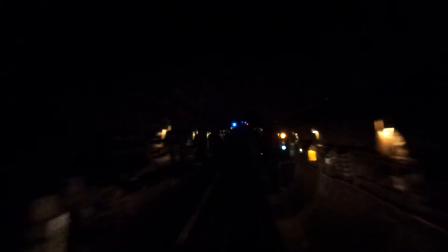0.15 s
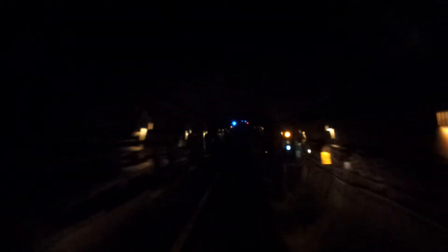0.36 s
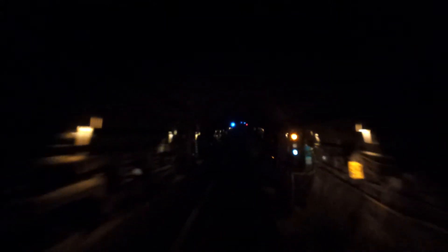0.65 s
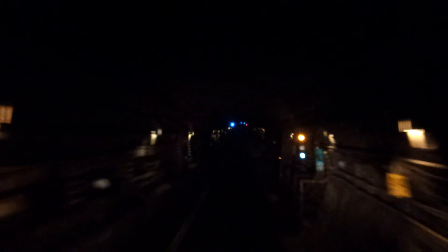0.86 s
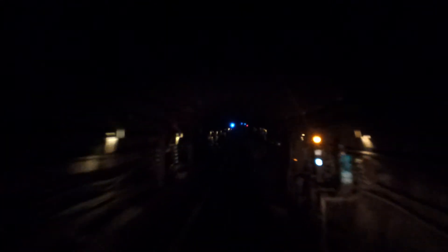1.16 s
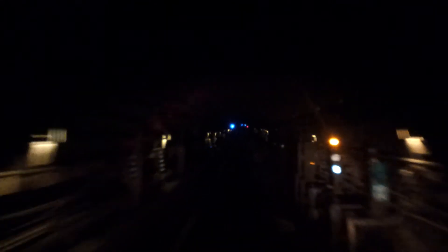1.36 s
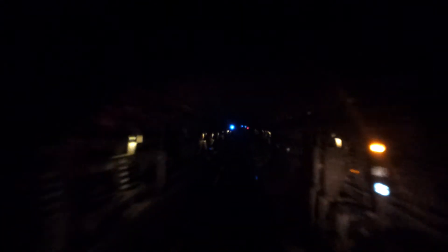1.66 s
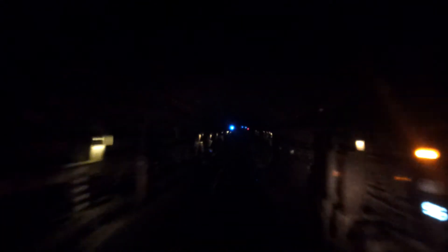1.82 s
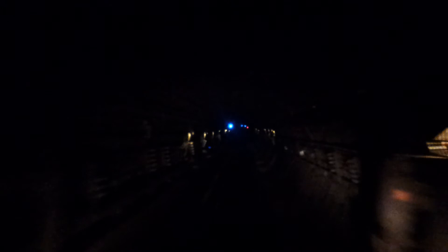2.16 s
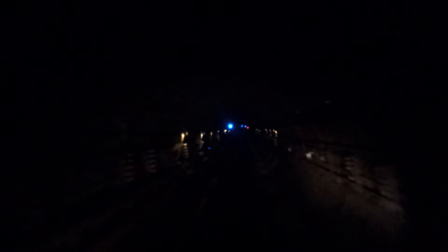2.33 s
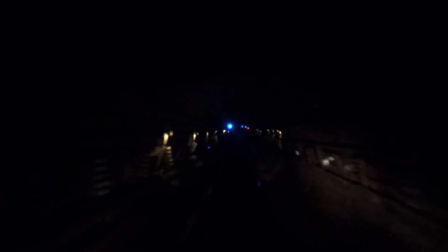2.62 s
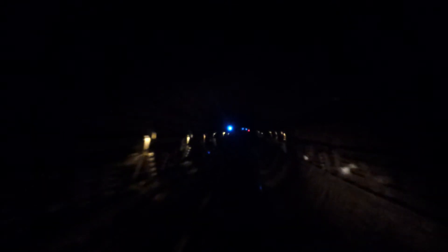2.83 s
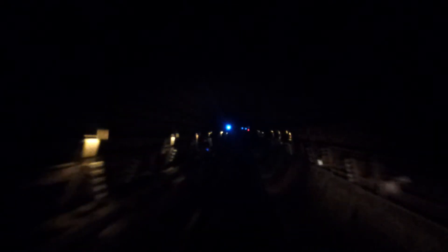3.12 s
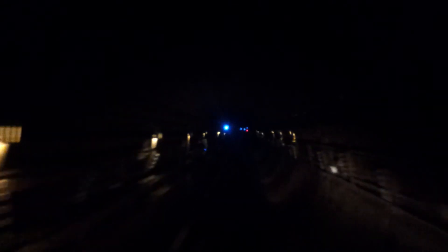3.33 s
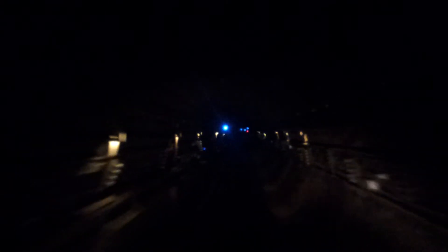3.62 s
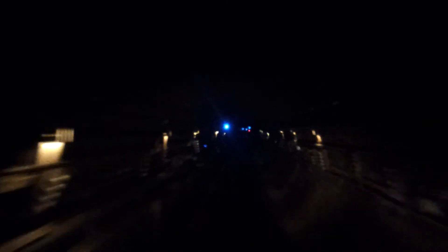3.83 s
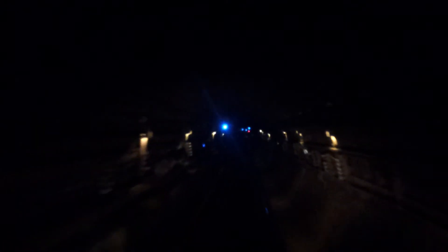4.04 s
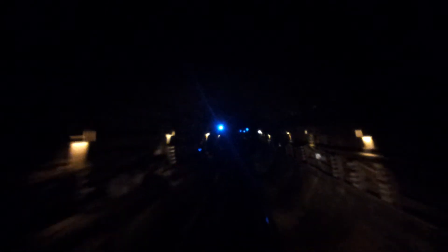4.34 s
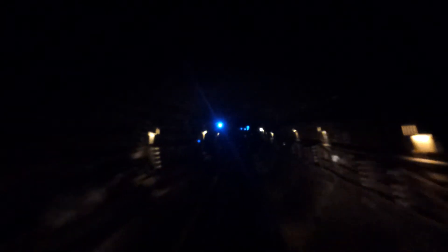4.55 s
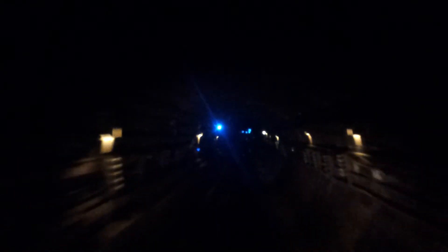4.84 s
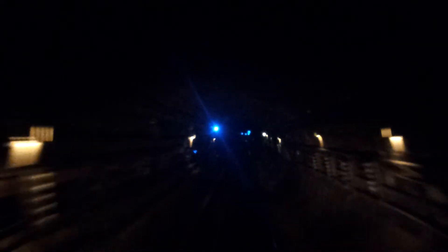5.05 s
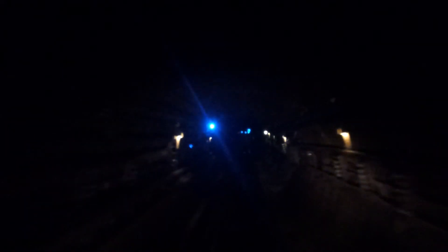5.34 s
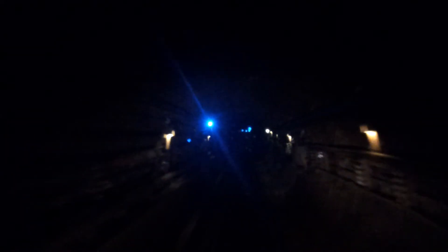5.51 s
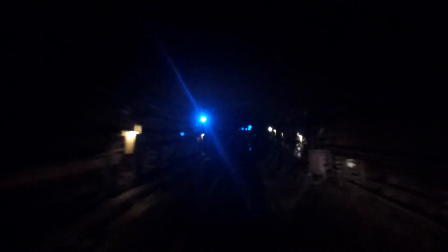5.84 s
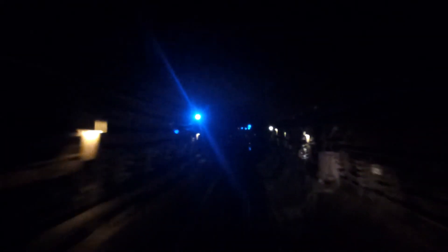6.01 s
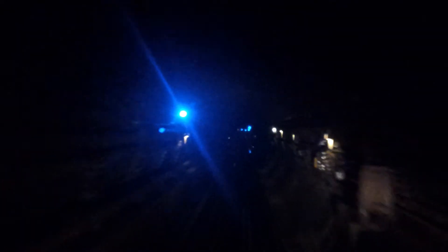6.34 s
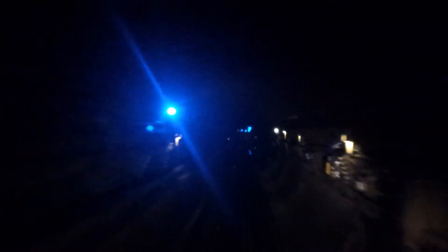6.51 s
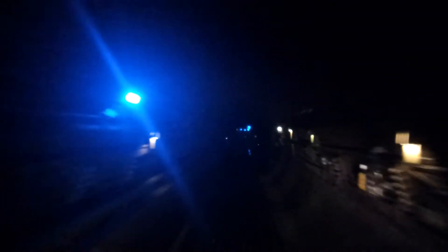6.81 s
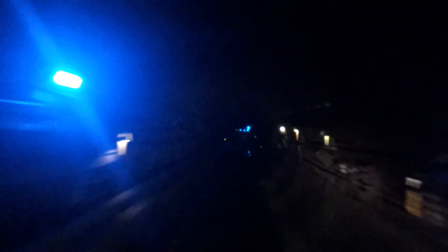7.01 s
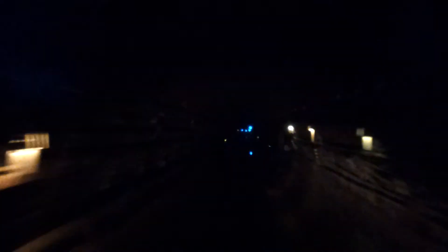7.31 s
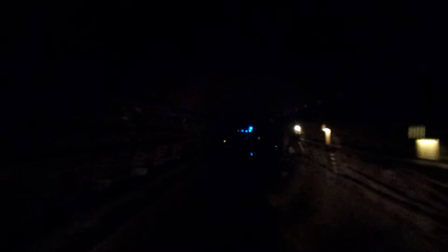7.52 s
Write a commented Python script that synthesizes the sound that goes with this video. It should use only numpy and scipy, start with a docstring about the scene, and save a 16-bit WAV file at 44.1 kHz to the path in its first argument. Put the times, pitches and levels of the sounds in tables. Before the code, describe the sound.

Continuous rumble and mid-low roar of train wheels on rough rail, close and enclosed, with the microphone inside the cab. The body resonates in brief surges while air leaks softly. A strong thump precedes two double clacks at a rail joint, short reflections following. Then bunched low jolts and a rough falling groan, faint flange scraping, sparse rattles and a late hard thump; the train never slows.

```python
"""A subway train runs at speed through a tunnel, heard from the front cab.
From the start, rough rails excite a rolling roar and a car body drone, gears hum and leaking air hisses.
Jolts of the bogie soon add hollow thumps, and loose fittings tick; then two pairs of axles clack over
a rail joint, with wall echoes. Later a dip draws a sinking groan from the bogie, and wheel flanges,
in faint contact throughout, scrape more strongly. Filtered noise makes all but hum and groan, two sines."""
import sys
import numpy as np
from scipy import signal
from scipy.fft import rfft, irfft
from scipy.io import wavfile
from scipy.ndimage import uniform_filter1d

SR = 44100
rng = np.random.default_rng(int(sys.argv[2]) if len(sys.argv) > 2 else 0)


def int16_out(signal):
    """Quantize to a 16-bit WAV file."""
    q = np.round(np.clip(np.atleast_2d(signal).T, -1, 1) * 32767)
    wavfile.write(sys.argv[1], SR, q.astype(np.int16))


N = 338247
TIME = np.arange(N) / SR
HZ = np.maximum(np.arange(N // 2 + 1) * SR / N, 1)

# All levels are relative. Rise times are exponential time constants; T60 is the time to fall by 60 dB.
# Spectrum of the sprung bogie's rumble: (frequency [Hz], level per Hz [dB])
RUMBLE_SPECTRUM = [(45, -28.5), (62, -5), (80, -3.5), (98, -5), (112, -6), (135, 4), (190, -1), (260, 2),
                   (300, -2.5), (450, -19)]
# Spectrum of the wheel roar through the cab walls: (frequency [Hz], level per Hz [dB])
ROAR_SPECTRUM = [(200, -13.5), (480, 7.5), (560, 1.5), (740, 2), (850, -3.5), (1080, -3.5), (1230, -8.5),
                 (1350, -5.5), (1560, -9.5), (1880, -20.5), (2150, -20), (2600, -17), (3700, -27.5),
                 (6000, -37)]
# Spectrum of air leaking round the cab door: (frequency [Hz], level per Hz [dB])
HISS_SPECTRUM = [(2500, -9.5), (4000, -4.5), (4900, -5.5), (5900, 4.5), (6600, 3.5), (7500, -2.5),
                 (8300, -6.5), (8800, -18.5), (9500, -13.5), (10300, -36)]
# Modes of the car body: (frequency [Hz], width [Hz], level [dB])
BODY_MODES = [(312, 26, -1.5), (332.7, 14, -1), (368.5, 28, 2), (405.3, 16.6, 0.5)]
# Hum of the traction gears: (time [s], pitch [Hz], level [dB])
GEAR_HUM = [(0, 330.2, -29.5), (1.5, 328.4, -25), (2.8, 336.2, -27.5), (3.35, 333.4, -18),
            (3.6, 329.8, -28.5), (4.1, 335.6, -20.5), (5.2, 339, -20), (5.5, 338, -25.5), (6.3, 340, -24),
            (6.6, 340.8, -27.5), (7.67, 337.8, -26.5)]
# Air resonances of the cab: (frequency [Hz], width [Hz], gain change [dB])
CAB_MODES = [(74, 15, -3.5), (141.4, 2.4, 3.5), (174.4, 7.8, 5), (205, 15, 5.5), (254.2, 4.5, 7),
             (485, 11, 1), (596, 19, 4.5)]
# Axles crossing a rail joint: (time [s], clang level [dB], body thud level [dB])
JOINT_CROSSINGS = [(2.246, -12, -5.5), (2.389, -12.5, -15), (2.958, -15, -13.5), (3.1, -16, -10.5)]
JOINT_RISE_S, JOINT_CROSSING_S, JOINT_T60_S, THUD_HZ = 0.013, 0.031, 0.2, 490
# Ring of wheel and rail at a joint: (frequency [Hz], level per Hz [dB])
CLANG_SPECTRUM = [(150, -8), (280, 5.5), (490, 9.5), (660, 0.5), (1050, 7), (1500, -1), (1950, -12.5),
                  (2800, -11), (4000, -20.5), (8000, -48)]
# Bogie thumps: (time [s], knock level [dB], knock pitch [Hz], floor shudder level [dB])
BOGIE_THUMPS = [(0.319, -11, 146, -12), (1.82, -2.5, 227, -10), (2.329, -8, 235, -15),
                (2.994, -7.5, 215, -11), (3.173, -10, 125, -18), (3.812, -7, 140, -20), (3.95, -9, 85, -16),
                (3.985, -8, 105, -18), (4.033, -6, 85, -19), (6.629, -1.5, 236, -6), (6.708, -14, 110, -14),
                (7.209, -11, 150, -26)]
KNOCK_WIDTH_HZ, KNOCK_RISE_S, KNOCK_T60_S = 102, 0.006, 0.12   # width of one mode, before cubing
FLOOR_RISE_S, FLOOR_T60_S = 0.016, 0.29
# Groan of the bogie in a dip: onset, level, initial pitch, time constant of the pitch, decay
GROAN_S, GROAN_DB, GROAN_HZ, GROAN_SINK_S, GROAN_T60_S = 3.952, -7.5, 245.5, 0.42, 0.7
# Rumble of the floor after a thump: (frequency [Hz], level per Hz [dB])
FLOOR_SPECTRUM = [(55, -15.5), (85, 5), (135, 4.5), (230, -6), (330, -3.5), (600, -25.5)]
# Loose fittings: (time [s], level [dB], upper edge of the snap [Hz])
FITTING_TICKS = [(0.4683, -25, 8000), (0.95, -20, 9000), (0.959, -28, 8000), (1.1334, -25, 8200),
                 (1.15, -30, 8000), (1.1672, -27, 10000), (1.183, -19.5, 11800), (4.531, -28, 9400),
                 (4.6947, -23, 8300), (5.1106, -25, 8500), (5.605, -25, 8000), (6.352, -22, 8200),
                 (7.0484, -22, 8000), (7.1094, -22, 8700), (7.4413, -27, 11200)]
TICK_RISE_S, TICK_T60_S = 0.0028, 0.067
# Ring of a fitting: (frequency [Hz], level per Hz [dB])
TICK_SPECTRUM = [(1500, -6), (2800, 11), (4500, 0.5), (6300, 7.5), (8000, 3.5), (9800, 0), (11400, -2),
                 (12300, -20), (14500, -22)]
# Tunnel wall echoes: (delay [s], level [dB])
WALL_ECHOES = [(.017, -16), (0.031, -27), (.054, -16), (0.086, -21)]
CUTOFF_HZ = 14800
# Roughness of the rail under the wheels: (time [s], level [dB])
RAIL_ROUGHNESS = [(0, -3.5), (.75, -2.5), (1.15, -2.5), (2.3, -0.2), (2.6, 0.5), (2.8, -2), (3.05, -1.5),
                  (3.4, -0.4), (3.6, -2.5), (3.8, -0.5), (4.25, -.3), (4.6, -0.1), (5.25, 2), (5.5, 1),
                  (5.95, 2), (6.55, -1), (6.95, -1), (7.42, 2.5), (7.67, -4)]
# Levels at 0 dB roughness, and the share of its swing in dB that each sound follows
DRONE_DB, DRONE_FOLLOWS = -18, 1.6
RAIL_DB, RAIL_FOLLOWS = -20.5, 0.84
RUMBLE_DB, RUMBLE_FOLLOWS = -21.5, 0.23
BOOM_DB, BOOM_FOLLOWS = -28.5, 0.2
# Rush of air along the cab: (time [s], level [dB])
AIR_RUSH = [(0, 0.5), (.6, -0.3), (.9, 1.9), (1.4, -0.2), (2.2, 0.7), (2.9, -0.5), (3.7, -0.3), (4.3, 1.1),
            (5.5, 0.5), (6.3, 2.3), (7.2, 0.5), (7.67, -1)]
HISS_DB, THROB_DB = -37, -35
WHEEL_DB, WHEEL_FOLLOWS, WHEEL_FOLLOWS_RUSH = -23, 0.22, 0.71
# Uneven track that sets the suspension booming: (time [s], length [s], level [dB])
UNEVEN_TRACK = [(.52, 0.28, -24), (1.87, .17, -30), (3.01, 0.29, -22.5), (3.79, 0.2, -26), (4.82, .08, -24),
                (5.2, 1.1, -26), (7.02, 0.8, -27)]
BOOM_RISE_S, BOOM_T60_S = 0.013, 0.35
UNEVEN_RUMBLE_DB = -6.5   # share of the unevenness that also shakes the bogie
# Corrugated patches that ring rail and car body up: (time [s], length [s], level [dB])
CORRUGATED_PATCHES = [(.87, 0.077, -15.5), (1.43, 0.072, -15.5), (1.915, 0.029, -16), (2.42, 0.043, -15),
                      (2.92, 0.27, -20.5), (3.32, 0.02, -14), (3.88, 0.069, -14), (4.05, 0.036, -15),
                      (4.61, 0.067, -12.5), (5.31, .045, -14.5), (6.43, 0.026, -11), (7.28, .06, -17.5),
                      (7.41, 0.035, -15), (7.6, .03, -11.5)]
PATCH_RAIL_DB = -12.5   # share of the corrugation that also raises the rail roar
PATCH_RISE_S, PATCH_T60_S = 0.011, 0.11
# Wheel flanges brushing the rail: (time [s], length [s], level [dB])
FLANGE_SCRAPES = [(4.235, 0.075, -33), (4.8, 0.54, -42), (5.55, .25, -43), (6.2, 0.32, -41)]
# Wheel modes that the flanges excite: (frequency [Hz], width before squaring [Hz], level [dB])
FLANGE_MODES = [(2630, 640, -3), (2900, 300, -9.5), (3350, 240, -9)]
FLANGE_DB = -44.5   # light contact throughout


def from_db(db):
    """Level definition: amplitude gain is ten to the power of dB / 20."""
    return 10 ** (np.asarray(db) / 20)


def rms_one(x):
    """Normalization of mean power: the rms becomes 1."""
    return x / np.sqrt(np.mean(x ** 2) + 1e-20)


def in_time(rows):
    """Linear interpolation: the columns of a time table at every sample."""
    times, *columns = np.transpose(rows)
    return [np.interp(TIME, times, column) for column in columns]


def colour(points):
    """Spectral shaping: gain in dB is interpolated over log frequency."""
    hz, db = np.transpose(points)
    return from_db(np.interp(np.log(HZ), np.log(hz), db, left=-70, right=-100))


def resonance(hz, width_hz):
    """Damped oscillator: complex response of one mode, with gain 1 at its peak."""
    return 1 / (1 + 1j * (HZ ** 2 - hz ** 2) / (HZ * width_hz))


def noise(response):
    """Linear filtering: Gaussian excitation passes a frequency response; rms 1."""
    excitation = rng.standard_normal(len(HZ)) + 1j * rng.standard_normal(len(HZ))
    return rms_one(irfft(excitation * response, N))


def steady(x, span_s):
    """Power equalization: division by the local rms evens out swings longer than span_s."""
    size = int(span_s * SR)
    power = uniform_filter1d(uniform_filter1d(x ** 2, size), size)
    return x / np.sqrt(power + 1e-9)


def flutter(rate_hz, depth_db):
    """Random modulation: a gain wanders with rms depth_db, mostly slower than rate_hz."""
    return from_db(depth_db * noise(1 / (1 + (HZ / rate_hz) ** 2) ** 2))


def blow(start, rise_s, t60):
    """Impact envelope: exponential build-up multiplied by exponential decay."""
    age = np.maximum(TIME - start, 0)
    return (1 - np.exp(-age / rise_s)) * from_db(-60 * age / t60)


def stretches(rows, rise_s, t60):
    """Sustained excitation: each stretch builds up, holds to its end, then decays exponentially."""
    total = 0
    for start, length, db in rows:
        build_up = 1 - np.exp(-np.maximum(TIME - start, 0) / rise_s)
        decay = from_db(-60 * np.maximum(TIME - start - length, 0) / t60)
        total = total + from_db(db) * build_up * decay
    return total


def cab():
    """Room resonance: the air modes of the cab raise or lower the gain near their frequencies."""
    return 1 + sum((from_db(db) - 1) * np.abs(resonance(hz, width)) ** 2 for hz, width, db in CAB_MODES)


def rolling(rough_db, rush_db, corrugation):
    """Roughness excitation: rails shake the bogie and radiate low, wheels radiate high."""
    deep = 1 / (1 + (HZ / 115) ** 10)   # share of the power that the suspension carries
    rails = 1 / (1 + (HZ / 850) ** 8)   # share of the power that the rails radiate
    low, high = colour(RUMBLE_SPECTRUM) * cab(), colour(ROAR_SPECTRUM) * cab()
    uneven = stretches(UNEVEN_TRACK, BOOM_RISE_S, BOOM_T60_S)
    # Independent excitations add in power.
    bounce = np.hypot(from_db(BOOM_DB + BOOM_FOLLOWS * rough_db), uneven)
    shake = np.hypot(from_db(RUMBLE_DB + RUMBLE_FOLLOWS * rough_db), from_db(UNEVEN_RUMBLE_DB) * uneven)
    roar = np.hypot(from_db(RAIL_DB + RAIL_FOLLOWS * rough_db), from_db(PATCH_RAIL_DB) * corrugation)
    boom = bounce * steady(noise(low * np.sqrt(deep)), 0.2)
    rumble = shake * steady(noise(low * np.sqrt(1 - deep)), 0.064)
    rail = roar * steady(noise(high * np.sqrt(rails)), 0.2)
    wheel_gain = from_db(WHEEL_DB + WHEEL_FOLLOWS * rough_db + WHEEL_FOLLOWS_RUSH * rush_db)
    wheel = wheel_gain * noise(high * np.sqrt(1 - rails))
    patches = flutter(36, 0.61)   # rough and smooth stretches of rail pass under the wheels
    return boom + (rumble + rail + wheel) * patches


def drone(rough_db, corrugation):
    """Forced vibration: shaking rings the car body modes, harder on corrugation; pitch wanders."""
    shaking = np.hypot(from_db(DRONE_DB + DRONE_FOLLOWS * rough_db), corrugation)
    power = sum(np.abs(from_db(db) * resonance(hz, width)) ** 2 for hz, width, db in BODY_MODES)
    panels = np.abs(resonance(355, 290)) ** 2   # the panels radiate only near their modes
    # Reading the noise at a varying speed bends its pitch.
    position = np.cumsum(flutter(4.006, 0.17)) % N
    wandering = np.interp(position, np.arange(N), noise(np.sqrt(power) * panels))
    return shaking * steady(wandering, 0.097)


def gears():
    """Phase accumulation: the traction gears hum as one sine of wavering pitch and level."""
    hz, db = in_time(GEAR_HUM)
    pitch = hz * flutter(15.76, 0.1397)
    tone = np.sin(2 * np.pi * np.cumsum(pitch) / SR)
    return from_db(db) * rms_one(flutter(10, 1.8) * tone)


def flanges():
    """Friction excitation: flanges brushing the rail drive the wheel modes with a rough scrape."""
    power = sum(np.abs(from_db(db) * resonance(hz, width) ** 2) ** 2 for hz, width, db in FLANGE_MODES)
    contact = np.hypot(from_db(FLANGE_DB), stretches(FLANGE_SCRAPES, 0.031, 0.12))
    scrape = noise(np.sqrt(power) / (1 + (HZ / 6000) ** 8))
    return contact * scrape * flutter(7.1, 1.2) * flutter(70, 1.9)


def air(rush_db):
    """Flow noise: the column of air pushed ahead throbs, and air hisses through the door gaps."""
    throb = from_db(THROB_DB) * steady(noise(resonance(47.8, 22) ** 3), 0.21)
    hiss = from_db(HISS_DB + rush_db) * noise(colour(HISS_SPECTRUM)) * flutter(24, 0.74)
    return throb + hiss


def thumps():
    """Impulse response: track dips jolt a hollow knock from the bogie, then a longer floor shudder."""
    knocks, shaking = 0, 0
    for start, knock_db, hz, floor_db in BOGIE_THUMPS:
        frame = steady(noise(resonance(hz, KNOCK_WIDTH_HZ) ** 3), 0.0088)
        knocks = knocks + from_db(knock_db) * blow(start, KNOCK_RISE_S, KNOCK_T60_S) * frame
        shaking = shaking + from_db(floor_db) * blow(start, FLOOR_RISE_S, FLOOR_T60_S)
    return knocks + shaking * steady(noise(colour(FLOOR_SPECTRUM)), 0.023)


def ticks():
    """Low-pass filtering: fittings chatter on their seats, and each snap is cut off above its own upper edge."""
    out = 0
    chatter = noise(colour(TICK_SPECTRUM)) * flutter(300, 2.1)
    for start, db, top_hz in FITTING_TICKS:
        contact = signal.butter(6, top_hz, fs=SR, output="sos")
        snap = from_db(db) * blow(start, TICK_RISE_S, TICK_T60_S) * chatter
        out = out + signal.sosfilt(contact, snap + 1e-18)   # tiny offset avoids slow near-zero arithmetic
    return out


def joints():
    """Impact excitation: wheel and rail clang during a crossing, and the car body thuds."""
    crossings = [(start, JOINT_CROSSING_S, db) for start, db, _ in JOINT_CROSSINGS]
    strikes = stretches(crossings, JOINT_RISE_S, JOINT_T60_S)
    thuds = sum(from_db(db) * blow(start, 0.024, 0.31) for start, _, db in JOINT_CROSSINGS)
    clang = strikes * steady(noise(colour(CLANG_SPECTRUM)), 0.0064)
    return clang + thuds * steady(noise(resonance(THUD_HZ, 240) ** 3), 0.019)


def tunnel(x):
    """Reflection: close walls return delayed copies, dulled by a low-pass response."""
    walls = sum(from_db(db) * np.exp(-2j * np.pi * HZ * delay) for delay, db in WALL_ECHOES)
    return x + irfft(rfft(x) * walls / (1 + 1j * HZ / 2500), N)


def groan():
    """Decaying oscillation: a dip draws a rough groan from the bogie, sinking as it dies."""
    age = np.maximum(TIME - GROAN_S, 0)
    pitch = GROAN_HZ * np.exp(-age / GROAN_SINK_S) * flutter(40, 0.36)
    swing = np.sin(2 * np.pi * np.cumsum(pitch) / SR) * flutter(25, 2.2)
    return from_db(GROAN_DB) * blow(GROAN_S, 0.015, GROAN_T60_S) * swing


def scene():
    """Superposition: all sounds add in the cab; only the joint sounds carry wall echoes."""
    rough_db, = in_time(RAIL_ROUGHNESS)
    rush_db, = in_time(AIR_RUSH)
    corrugation = stretches(CORRUGATED_PATCHES, PATCH_RISE_S, PATCH_T60_S)
    ride = rolling(rough_db, rush_db, corrugation) + drone(rough_db, corrugation)
    ride = ride + gears() + flanges() + air(rush_db)
    events = thumps() + ticks() + tunnel(joints()) + groan()
    return (ride + events)[None, :]


def record(dry):
    """Band limiting and saturation: deep bass is lost, peaks round off, the top is cut."""
    thin = signal.sosfilt(signal.butter(10, 37, "high", fs=SR, output="sos"), dry)
    rounded = thin / (1 + np.abs(thin) ** 8) ** (1 / 8)
    fade_in = np.minimum(TIME / 0.004, 1)
    return signal.sosfilt(signal.butter(16, CUTOFF_HZ, fs=SR, output="sos"), rounded * fade_in)


dry = scene()
out = record(dry)
int16_out(out)
```